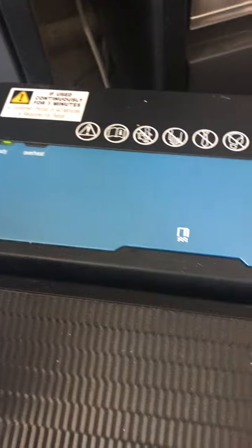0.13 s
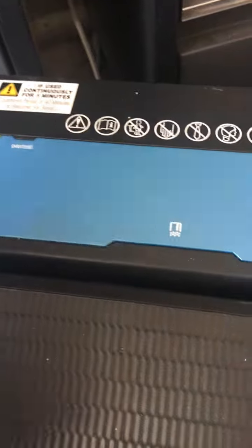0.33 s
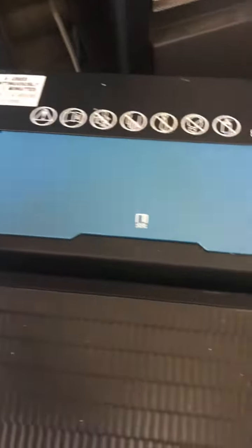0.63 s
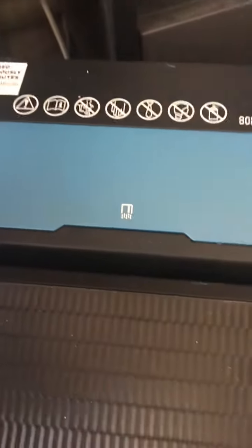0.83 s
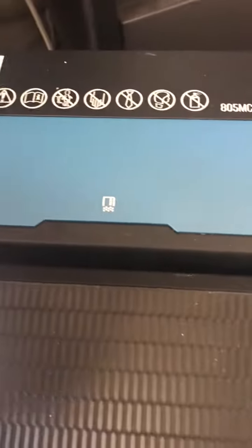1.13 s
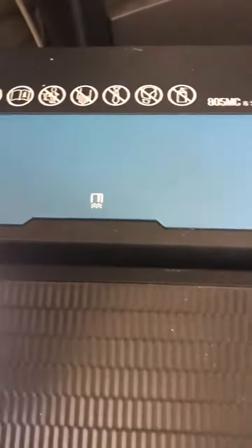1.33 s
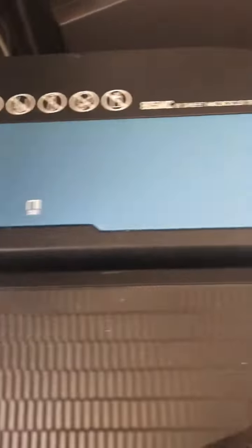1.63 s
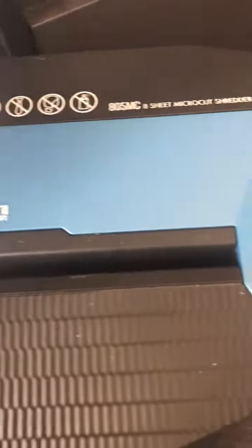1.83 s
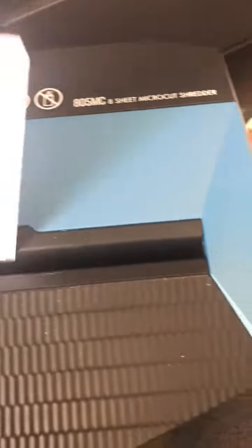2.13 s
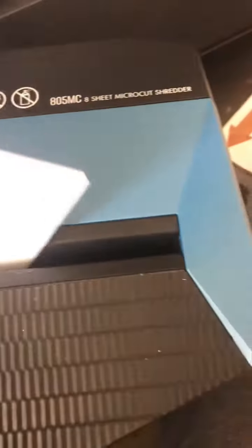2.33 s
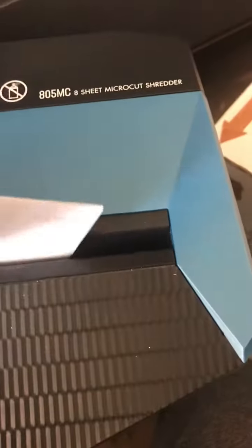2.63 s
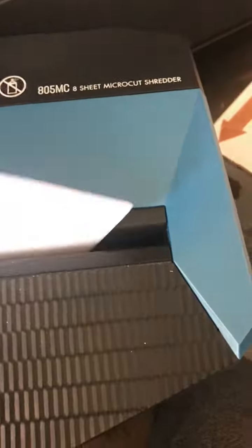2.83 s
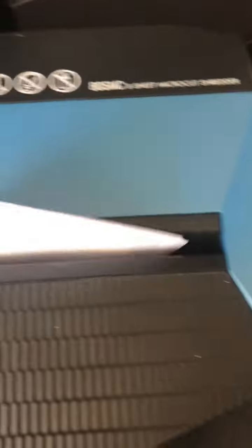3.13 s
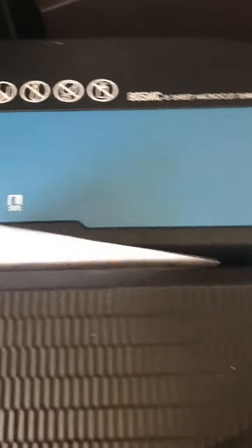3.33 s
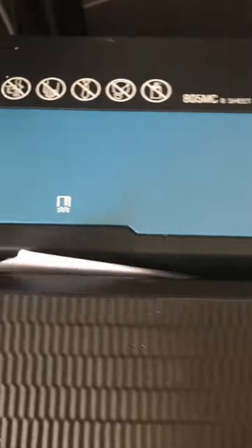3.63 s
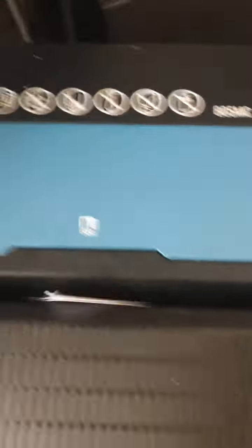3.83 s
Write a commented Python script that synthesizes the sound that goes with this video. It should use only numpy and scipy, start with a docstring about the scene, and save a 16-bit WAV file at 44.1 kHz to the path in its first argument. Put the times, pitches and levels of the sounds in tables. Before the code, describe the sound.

A paper shredder in a small, fairly dry room, close microphone. After near silence for 0.1 s, low rumble and quiet paper swishes, with light snaps near 0.26, 0.9 and 1.2 s. At 2.6 s the motor thumps on, rising within 0.3 s to a loud buzzing, rattling whine. Brief squeaks come near 3.0 s; tearing crackle and sharp snaps continue as pitch sags slightly and grinding strengthens until 4 s.

```python
"""An office shredder in a small room takes in a sheet of paper, which is first handled close by.
The motor is a stack of swaying multiples of its shaft speed, with brush buzz, hum and a rattling
plastic housing; it spins up, then slows a little as the cutters bite. The paper is shaped noise
and tiny impacts: swishes, tearing crackle, sharp snaps and short squeaks."""
import sys
import numpy as np
from scipy import signal
from scipy.fft import rfft, irfft, next_fast_len
from scipy.io import wavfile
from scipy.ndimage import uniform_filter1d, map_coordinates

SR = 44100
rng = np.random.default_rng(int(sys.argv[2]) if len(sys.argv) > 2 else 0)


def dump(signal):
    """Clip the signal to [-1, 1] and save it as 16-bit WAV at the path in sys.argv[1]."""
    limited = np.clip(np.atleast_2d(signal).T, -1, 1)
    pcm = np.round(limited * 32767).astype(np.int16)
    wavfile.write(sys.argv[1], SR, pcm)


N = 176400
T = np.arange(N) / SR

START_S = 2.635  # the motor switches on
TOP_HZ = 15900  # upper band limit of the microphone

# broadband colour of the housing, for rattle and brush buzz: f/Hz, level/dB
HOUSING_COLOUR = [(38, -55), (69, -17), (194, -0.5), (402, -6), (491, -11), (852, -12.5), (1090, -5.5),
                  (1850, -16.5), (2700, -15.5), (4930, -22), (14800, -26.5)]


def amp(db):
    """Decibels to linear gain."""
    return 10 ** (np.asarray(db) / 20)


def unit(x):
    """x scaled to rms 1."""
    return x / np.sqrt(np.mean(x ** 2) + 1e-20)


def curve(rows):
    """One value per sample, in straight lines between (s, value) points."""
    return np.interp(T, *np.transpose(rows))


def wobble(rate):
    """A smooth random curve with rate knots a second."""
    knots = rng.standard_normal(int(N * rate / SR) + 4)
    return map_coordinates(knots, [T * rate])


def filtered(x, response):
    """x with its spectrum multiplied by a response of frequency."""
    m = next_fast_len(len(x) + 8192)  # padding keeps the filter's ringing from wrapping round
    hz = np.fft.rfftfreq(m, 1 / SR) + 1e-3
    return irfft(rfft(x, m) * response(hz), m)[:len(x)]


def coloured(x, points):
    """x shaped by a (Hz, dB) curve drawn on a log frequency axis, at rms 1."""
    f, db = np.transpose(points)
    return unit(filtered(x, lambda hz: amp(np.interp(np.log(hz), np.log(f + 1), db))))


def bumps(rows, hz):
    """The gain of a few (Hz, half width Hz, dB) peaks and dips."""
    return amp(sum(db / (1 + ((hz - c) / w) ** 2) for c, w, db in rows))


def grains(per_s, spread_db):
    """Random tiny impacts of uneven size and either sign, at rms 1."""
    size = amp(spread_db * np.minimum(rng.standard_normal(N), 2.5))
    hits = rng.random(N) < per_s / SR
    return unit(hits * size * np.sign(rng.standard_normal(N)))


def patchy(x, depth_db):
    """x at rms 1, its colour shifting at random from moment to moment."""
    z = signal.stft(x, nperseg=256)[2]
    field = uniform_filter1d(rng.standard_normal(z.shape), size=5, axis=0)  # smooth over frequency
    field = uniform_filter1d(field, size=12, axis=1)  # and over time
    return unit(signal.istft(z * amp(depth_db * unit(field)), nperseg=256)[1][:N])


def background():
    """Low room rumble of shaped noise, with a steady drone that sways slightly."""
    # rumble spectrum: f/Hz, level/dB
    room_tone = [(20, -24), (59, 2), (97, -13), (128, -7), (174, -11.5), (291, -18), (910, -29),
                 (1540, -120)]
    room_db, drone_hz, drone_db = -56, 76, -59
    phase = 2 * np.pi * drone_hz * T + .5 * wobble(7)
    drone = np.sqrt(2) * amp(drone_db + wobble(6)) * np.sin(phase)
    return amp(room_db) * coloured(rng.standard_normal(N), room_tone) + drone


def sheet():
    """Paper slides and flexes: rubbing noise swells and fades, its body thinning near the slot."""
    # slides and flexes of the sheet: centre t/s, half length/s, level/dB
    swishes = [(0.259, 0.016, -48.5), (0.404, 0.032, -47.5), (0.48, 0.022, -42.5), (0.528, 0.027, -51),
               (0.65, 0.043, -52.5), (0.87, 0.015, -50.5), (0.923, 0.026, -42.5), (1.122, 0.046, -51),
               (1.252, 0.036, -52), (1.364, 0.021, -50.5), (1.45, 0.027, -53), (1.687, 0.028, -45.5),
               (1.81, 0.094, -56), (1.947, 0.058, -47), (2.151, 0.02, -50), (2.282, 0.01, -56),
               (2.41, 0.071, -56.5), (2.582, 0.11, -47)]
    # rustle spectrum: f/Hz, level/dB
    paper = [(240, -10), (708, -14), (1230, 2), (1840, -3), (2880, -2), (7630, -0.5), (12500, -3),
             (16000, -11.5)]
    rest_db, body_db, thins_db_per_s = -62.5, 3, 1.5
    power = amp(rest_db) ** 2 * (T < START_S)
    for s, half, db in swishes:
        power = power + amp(db) ** 2 * np.exp(-((T - s) / half) ** 2)
    level = np.sqrt(power) * amp(1.75 * wobble(60))
    friction = rng.standard_normal(N) + 0.44 * grains(per_s=700, spread_db=4.5)
    rub = coloured(patchy(friction, depth_db=2.0), paper)
    body = filtered(rub, lambda hz: 1 / (1 + (hz / 4500) ** 4))
    crisp = rub - body
    return level * (crisp + body * amp(body_db - thins_db_per_s * T))


def squeaks():
    """Stick-slip of sheet on plastic: brief wavering tones that sag in pitch."""
    # squeaks: centre t/s, f/Hz at the centre, level/dB rms at the centre, Gaussian half length/s
    squeak_rows = [(0.254, 4450, -47, 0.0042), (2.96, 4730, -33, 0.011), (3.002, 4590, -34, .009)]
    waver, sag_hz_per_s = .025, 5000
    out = np.zeros(N)
    for s, hz, db, half in squeak_rows:
        pitch = (hz - sag_hz_per_s * (T - s)) * (1 + waver * wobble(400))
        swell = np.exp(-((T - s) / half) ** 2 / 2)
        out += amp(db) * swell * np.sin(2 * np.pi * np.cumsum(pitch) / SR)
    return np.sqrt(2) * out


def snaps():
    """A buckling crease cracks: a band of noise that dies within milliseconds."""
    # snaps and ticks: t/s, level/dB, centre f/Hz, octaves to either side, decay by 60 dB/s
    snap_rows = [(0.2576, -26, 1890, .7, 0.01), (0.8917, -30, 2580, 0.65, 0.011),
                 (1.195, -31.5, 3100, 0.93, 0.013), (1.375, -37.5, 9700, 0.93, 0.019),
                 (1.397, -39, 1130, 0.29, 0.022), (2.171, -44, 570, 1.1, 0.028),
                 (2.913, -16.5, 5600, 0.38, 0.012), (2.935, -15.5, 6000, 0.21, 0.016),
                 (3.0586, -4.5, 5950, 3.3, 0.0094), (3.0606, -12.5, 1770, 1.3, 0.022),
                 (3.12, -12, 7000, .6, .005), (3.1272, -2, 7050, 0.78, 0.0039),
                 (3.151, -15, 7100, 0.97, 0.015), (3.3735, -8.5, 6634, 0.45, 0.0062),
                 (3.438, -16, 9000, .7, 0.014), (3.597, -7.5, 6940, 0.42, 0.0065),
                 (3.7473, -9.5, 11100, 0.15, .007), (3.8602, -4.5, 9500, 1.26, 0.0062),
                 (3.893, -17, 5500, .9, .007)]
    out, t = np.zeros(N + SR), np.arange(SR // 8) / SR
    for s, db, centre_hz, octaves, t60 in snap_rows:
        edges = np.clip([centre_hz / 2 ** octaves, centre_hz * 2 ** octaves], 50, TOP_HZ)
        band = signal.butter(2, edges, 'bandpass', fs=SR, output='sos')
        burst = signal.sosfilt(band, np.sign(rng.standard_normal(len(t))))
        out[round(s * SR):][:len(t)] += amp(db - 2) * unit(burst) * amp(-60 * t / t60)
    return out[:N]


def knocks():
    """Soft, low rings of the plastic case as the sheet touches it and the motor jolts."""
    # knocks: t/s, level/dB before the attack softens it, f/Hz, attack/s, decay by 60 dB/s
    knock_rows = [(0.2578, -30, 547, 0.00039, 0.02), (2.173, -26, 169.4, 0.017, 0.11),
                  (2.638, -17.5, 329, 0.0039, 0.045), (2.658, -17.5, 121, 0.015, 0.17),
                  (2.683, -15.5, 185, 0.013, .16)]
    out = np.zeros(N)
    for s, db, hz, attack, t60 in knock_rows:
        t = np.maximum(T - s, 0)
        onset = 1 - np.exp(-t / attack)
        out += amp(db - 60 * t / t60) * onset * np.sin(2 * np.pi * hz * t)
    return out


def tones(rows, speed, load, flutter):
    """Slightly unsteady multiples of the shaft speed, whose levels follow the load."""
    sway_db = 1.6
    out = np.zeros(N)
    for order, idle_db, loaded_db in rows:
        turns = np.cumsum(speed * (1 + flutter * wobble(70))) / SR
        level_db = idle_db + (loaded_db - idle_db) * load + sway_db * wobble(22.2)
        out += amp(level_db) * np.sin(2 * np.pi * order * turns)
    return np.sqrt(2) * out


def whine_and_gears(speed):
    """Motor whine and gear tones, muffled or amplified by the case as they sweep its bands."""
    # load on the motor, high in spin-up and again as the sheet is drawn in: t/s, share 0-1
    load_points = [(2.8, .8), (2.95, 0), (3.35, .1), (3.6, .7), (3.75, 1)]
    # motor whine: multiple of shaft speed, idle level/dB, loaded level/dB
    whine = [(1, -41, -33), (2, -44, -40), (4, -48, -41), (8, -57, -48), (9, -57, -50), (11, -48, -57),
             (12, -58, -45), (16, -65, -54), (20, -48, -60)]
    # gear tones: multiple of shaft speed, idle level/dB, loaded level/dB
    gears = [(.54, -45, -38), (.66, -44, -36), (1.38, -43, -54), (1.63, -51, -40.5), (2.4, -42, -44.5),
             (3.7, -46, -46.5), (4.25, -52, -43), (.87, -44, -41.5)]
    # bands of the case: f/Hz, half width/Hz, gain/dB
    panels = [(740, 150, -10), (970, 60, 8), (2130, 130, 9), (2700, 200, -6), (3280, 90, 6)]
    load = curve(load_points)
    lines = tones(whine, speed, load, flutter=.0026) + tones(gears, speed, load, flutter=.011)
    return filtered(lines, lambda hz: bumps(panels, hz))


def brush_buzz(speed):
    """The brushes: shaft-speed multiples 2 to 49, each swaying in strength, in housing colour."""
    turns = np.cumsum(speed) / SR
    buzz = np.zeros(N)
    for k in range(2, 50):
        buzz += amp(1.8 * wobble(8.2)) * np.sin(2 * np.pi * (k * turns + rng.random()))
    return coloured(buzz, HOUSING_COLOUR)


def housing_rattle(pace):
    """Gear teeth strike the housing: random impacts ring its modes and rattle it broadly."""
    # resonances of the housing: f/Hz, width/Hz, level/dB
    housing = [(202, 94, -1), (1077, 97, -5.5), (1375, 53, -2.5), (3265, 75, -6), (4010, 160, -10.5)]
    ring_db, rattle_db, grows_db_per_s = -37, -34.5, 2.5

    def teeth():
        return grains(per_s=2500, spread_db=4) * amp(1.4 * wobble(90))

    def modes(f):
        total = 0
        for k, (c, w, db) in enumerate(housing):
            total = total + (-1) ** k * amp(db) * 1j * f * w / (c * c - f * f + 1j * f * w)
        return total / (1 + (110 / f) ** 4)  # little below 110 Hz

    ring = unit(filtered(teeth(), modes))
    rattle = amp(ring_db) * ring + amp(rattle_db) * coloured(teeth(), HOUSING_COLOUR)
    low = filtered(rattle, lambda hz: 1 / (1 + (hz / 1000) ** 2))
    # only the upper part follows the motor's pace
    return (low + pace * (rattle - low)) * amp(grows_db_per_s * (T - START_S))


def mains_hum():
    """A 120 Hz hum at the motor, swaying in level."""
    return np.sqrt(2) * amp(-43 + 3.1 * wobble(10)) * np.sin(2 * np.pi * 120 * T)


def chatter(speed):
    """A slow gear binds once a revolution and rings briefly, harder as the sheet goes in."""
    # stroke strength: t/s, level/dB
    strength = [(2.9, -50), (3.45, -33), (3.9, -27)]
    turns_per_stroke, order = 11, 5  # shaft turns; pitch as a multiple of shaft speed
    stroke_at_s = 3.874  # one stroke peaks here, which sets the phase of the rest
    turns = np.cumsum(speed) / SR
    cycle = (turns - np.interp(stroke_at_s, T, turns)) / turns_per_stroke
    strokes = np.cos(np.pi * cycle) ** 4
    tone = np.sin(2 * np.pi * order * turns + wobble(18))
    return amp(curve(strength) + 2.4 * wobble(20)) * strokes * tone


def motor():
    """One shaft speed drives whine, gears, buzz, rattle and chatter; the hum keeps its pitch."""
    # motor shaft speed: t/s, turns per second/Hz
    speed_points = [(2.635, 50), (2.7, 175), (2.75, 237), (2.8, 261), (2.85, 273.5), (2.9, 284),
                    (3.05, 295), (3.2, 293), (3.6, 283), (4.0, 271)]
    full_hz, buzz_db, rise_s = 273, -35, 0.0049
    speed = curve(speed_points)
    pace = speed / full_hz
    lines = pace * whine_and_gears(speed) + pace ** 2 * amp(buzz_db) * brush_buzz(speed)
    switched_on = np.clip((T - START_S) / rise_s, 0, 1)
    return switched_on * (lines + chatter(speed) + housing_rattle(pace) + mains_hum())


def cutters():
    """Fibres tear in dense clumps between the blades, with sparser cracks on top."""
    # cutting crackle: t/s, level/dB
    cutting = [(2.64, -41.5), (2.75, -41.5), (2.92, -33.5), (3.15, -34.5), (3.5, -33.5), (4.0, -33)]
    # crackle spectrum: f/Hz, level/dB
    crackle = [(800, -24), (2500, -0.5), (4800, 0.5), (6800, 0), (9500, -1), (16000, -5)]
    clumps = unit(rng.standard_normal(N) * amp(3.1 * wobble(140)))
    tearing = clumps + amp(-3) * grains(per_s=300, spread_db=3)
    bite = np.clip((T - START_S) / 0.07, 0, 1)
    level = bite * amp(curve(cutting) + wobble(22))
    return level * coloured(patchy(tearing, depth_db=2.5), crackle)


def room(x):
    """A short indoor tail: x plus its echo in decaying noise."""
    t60_s, wet_db = 0.092, -12
    t = np.arange(SR // 3) / SR
    tail = rng.standard_normal(len(t)) * amp(-60 * t / t60_s) * (t > .003)
    return x + amp(wet_db) * signal.fftconvolve(x, tail / np.linalg.norm(tail))[:N]


def scene():
    """Paper sounds in the room, with motor, knocks and background added dry."""
    paper_sounds = sheet() + cutters() + snaps() + squeaks()
    return (room(paper_sounds) + motor() + knocks() + background())[None]


def record(dry):
    """The microphone opens just after the start, from 40 dB down, and keeps nothing above TOP_HZ."""
    # dips in the microphone's treble: f/Hz, half width/Hz, gain/dB
    mic = [(4950, 250, -3.5), (7400, 170, -4.5), (10400, 280, -5)]
    open_s, rise_s = 0.083, 0.0092
    opened = np.clip((T - open_s) / rise_s, .01, 1)
    return filtered(dry[0] * opened, lambda hz: bumps(mic, hz) * (hz < TOP_HZ))[None]


dry = scene()
out = record(dry)
dump(out)
```